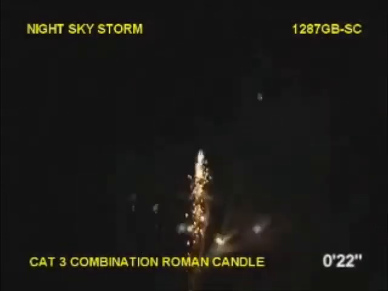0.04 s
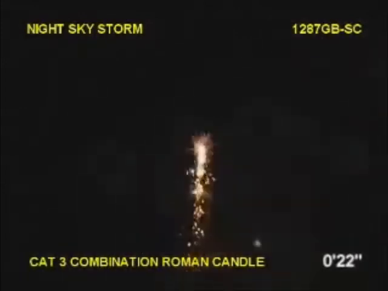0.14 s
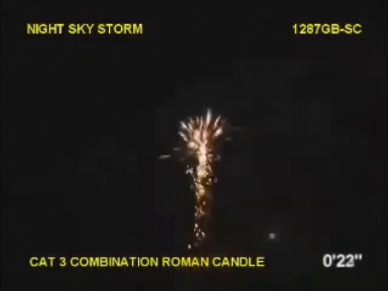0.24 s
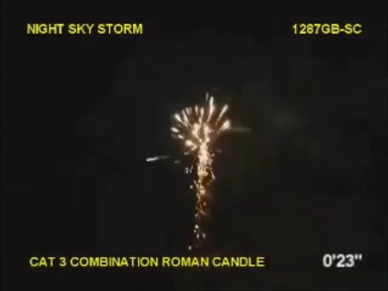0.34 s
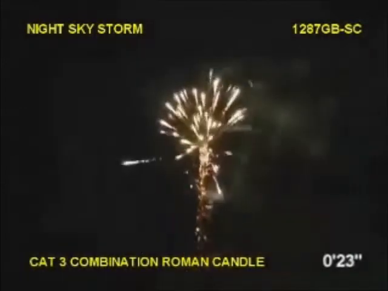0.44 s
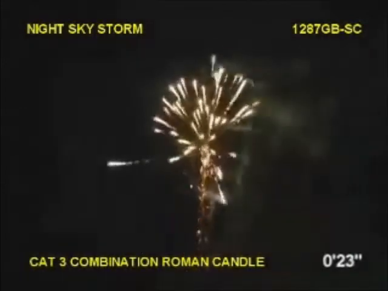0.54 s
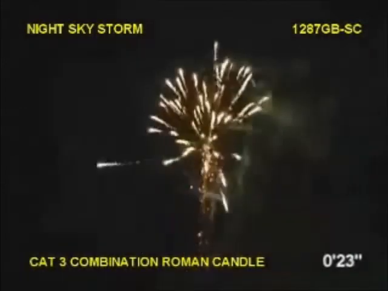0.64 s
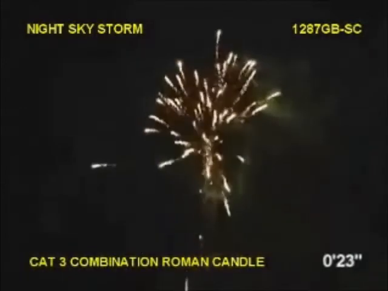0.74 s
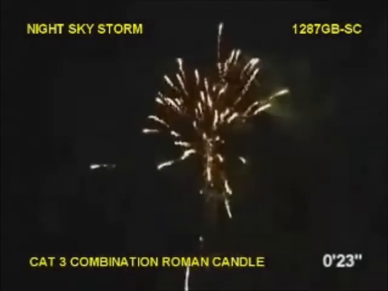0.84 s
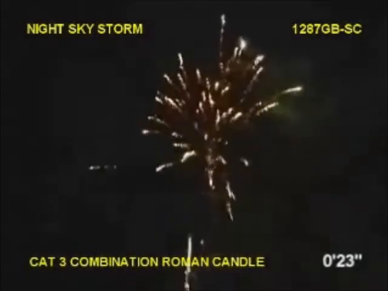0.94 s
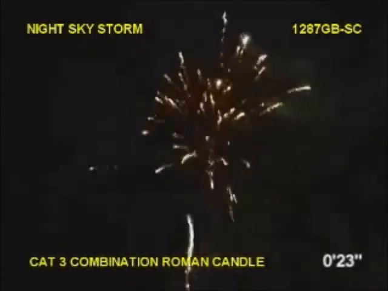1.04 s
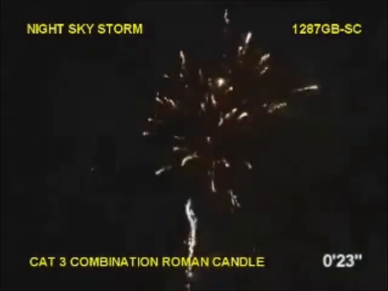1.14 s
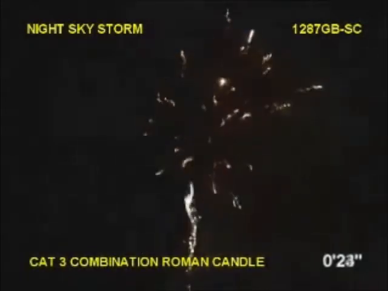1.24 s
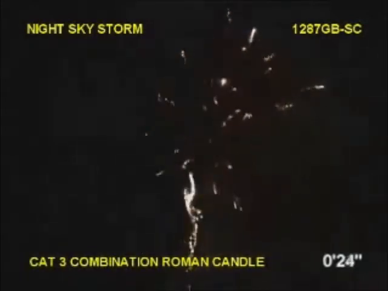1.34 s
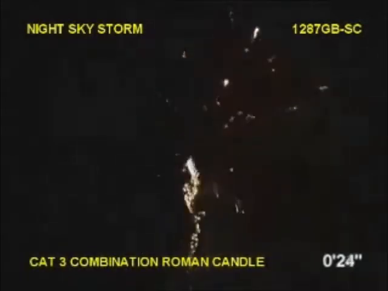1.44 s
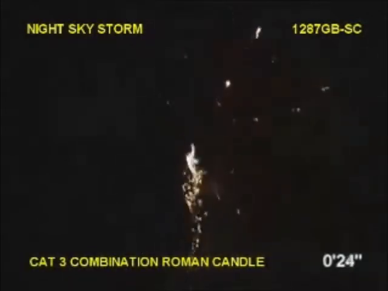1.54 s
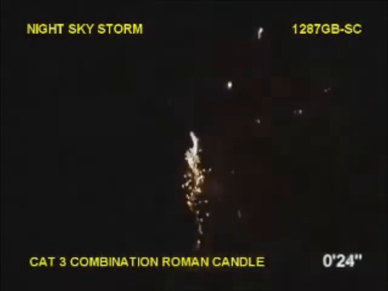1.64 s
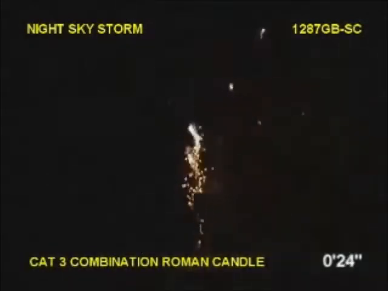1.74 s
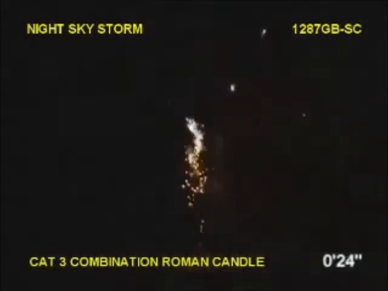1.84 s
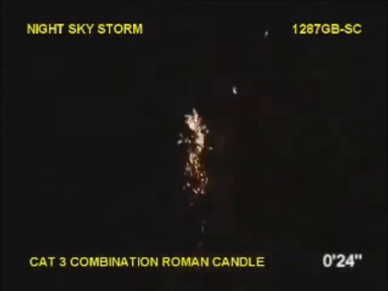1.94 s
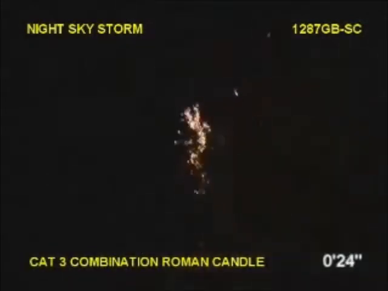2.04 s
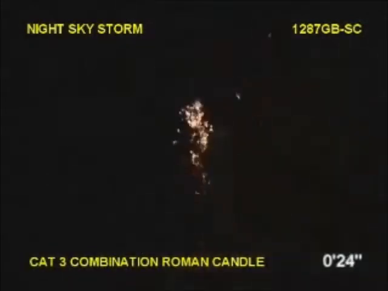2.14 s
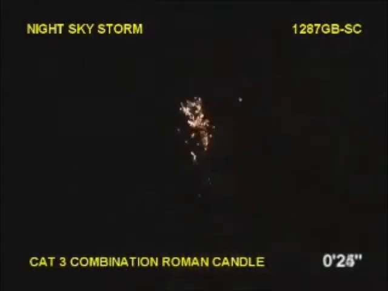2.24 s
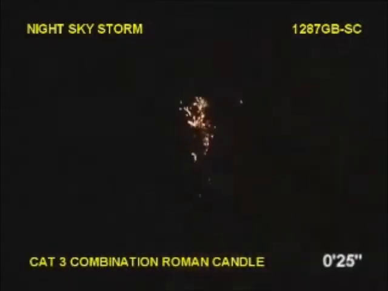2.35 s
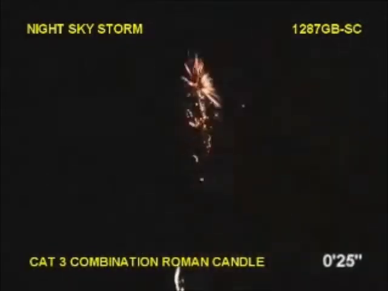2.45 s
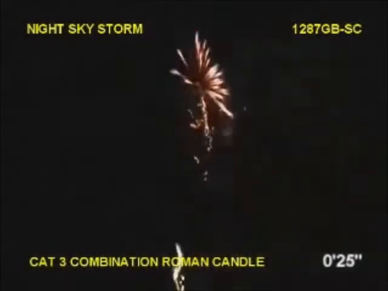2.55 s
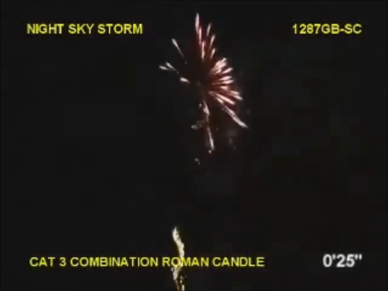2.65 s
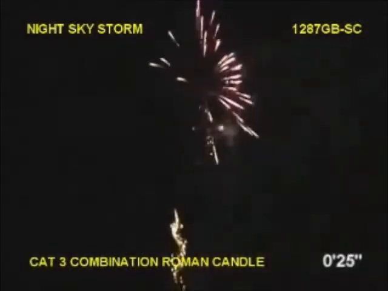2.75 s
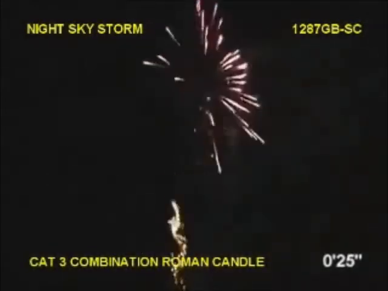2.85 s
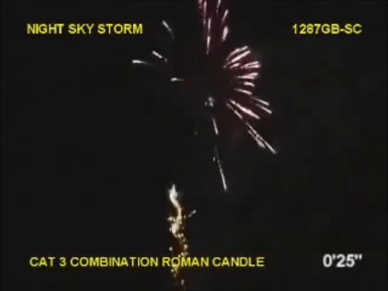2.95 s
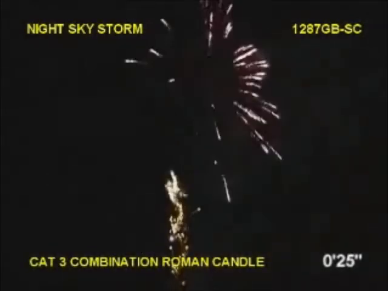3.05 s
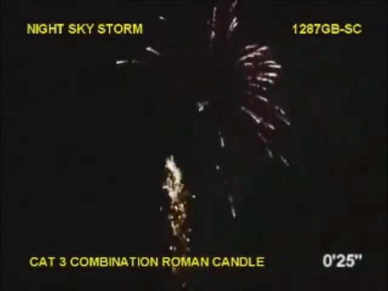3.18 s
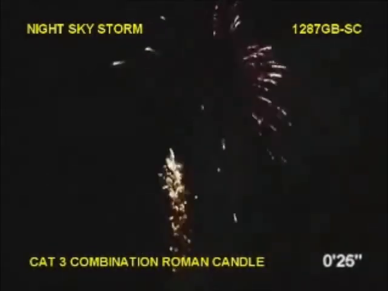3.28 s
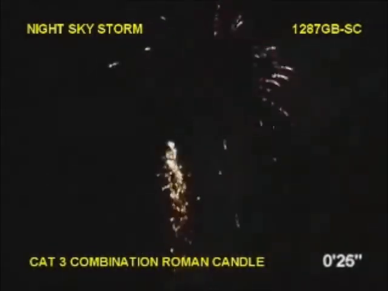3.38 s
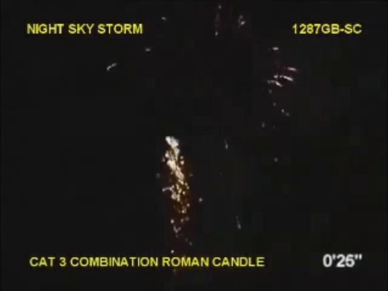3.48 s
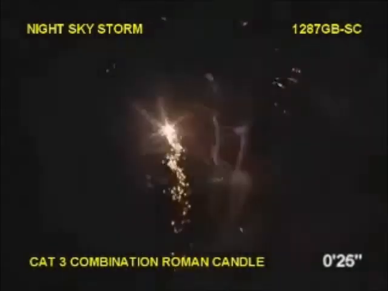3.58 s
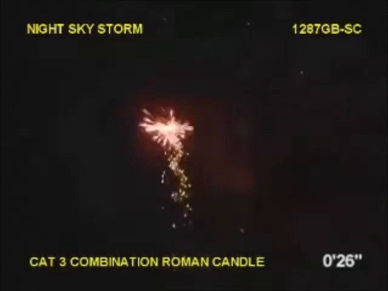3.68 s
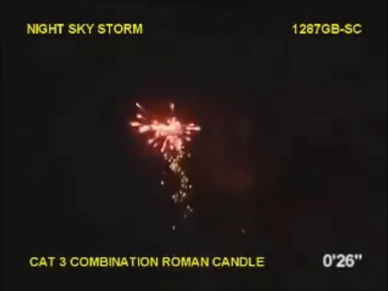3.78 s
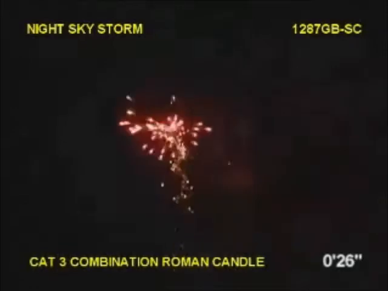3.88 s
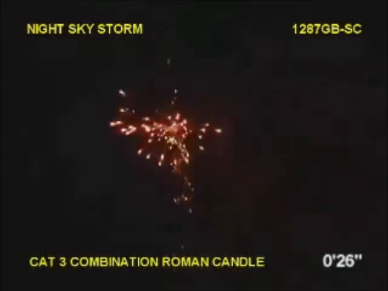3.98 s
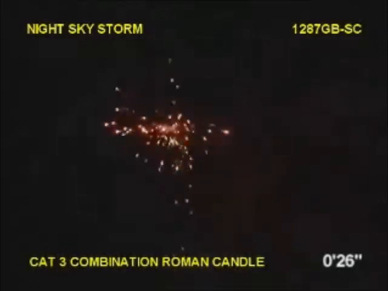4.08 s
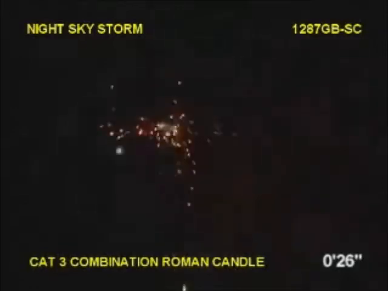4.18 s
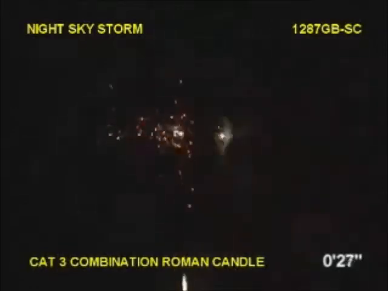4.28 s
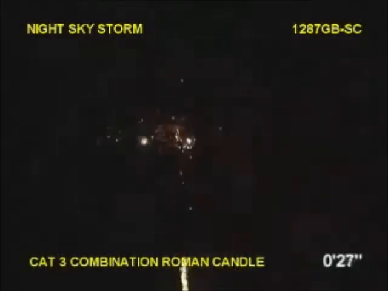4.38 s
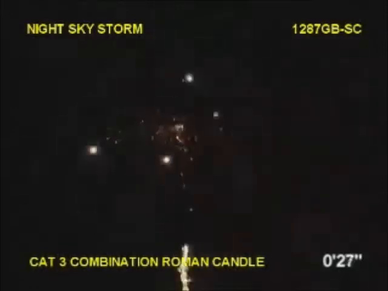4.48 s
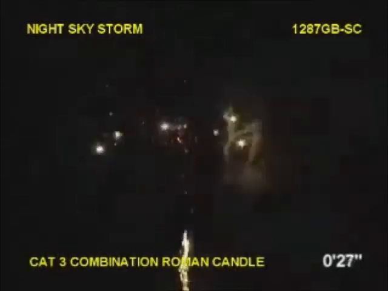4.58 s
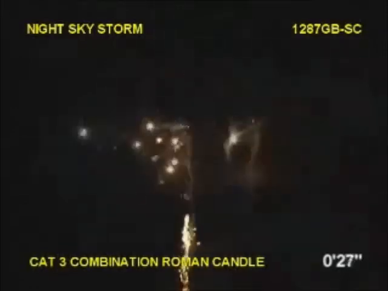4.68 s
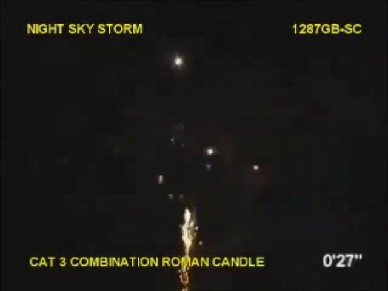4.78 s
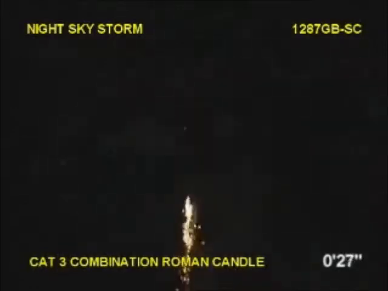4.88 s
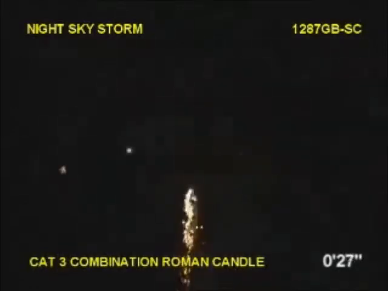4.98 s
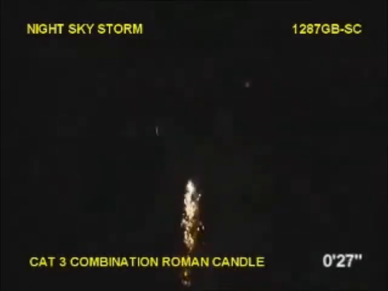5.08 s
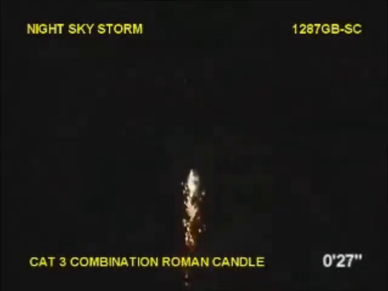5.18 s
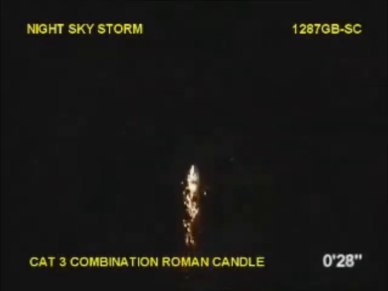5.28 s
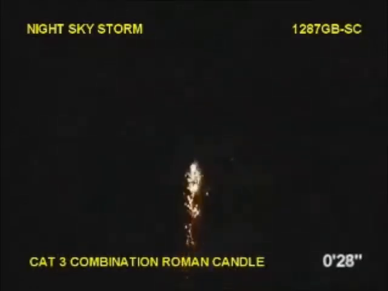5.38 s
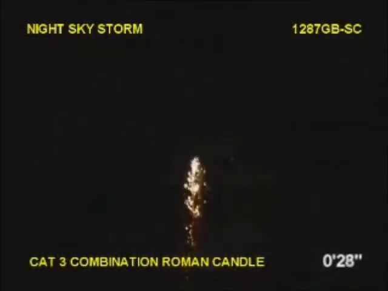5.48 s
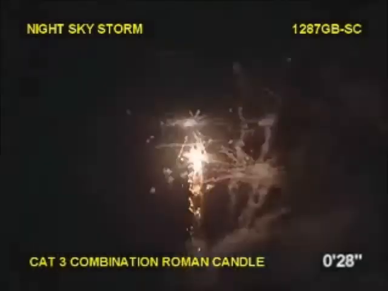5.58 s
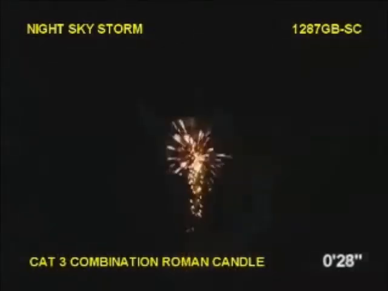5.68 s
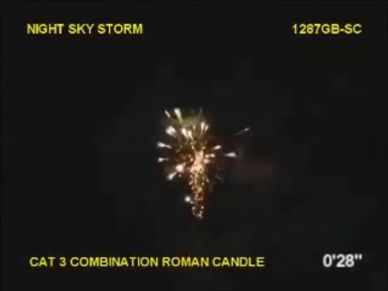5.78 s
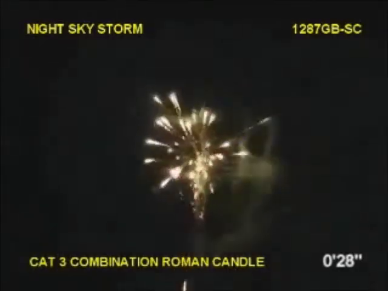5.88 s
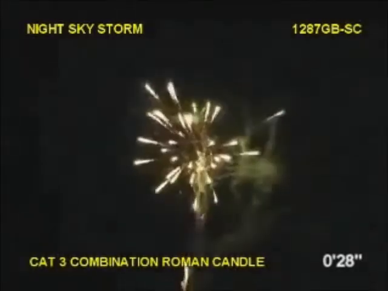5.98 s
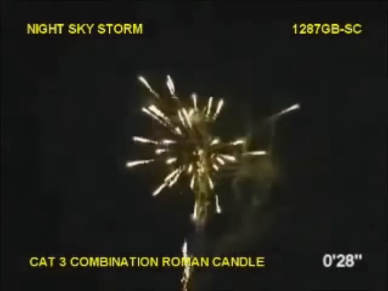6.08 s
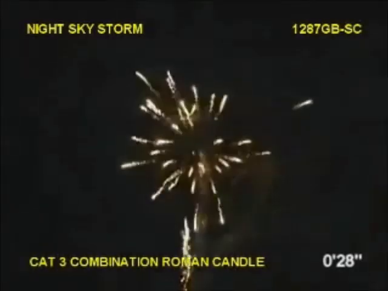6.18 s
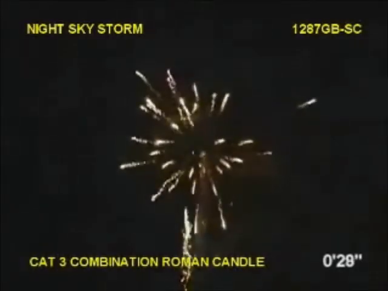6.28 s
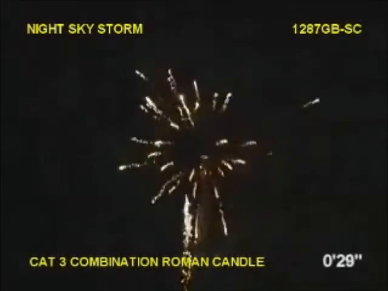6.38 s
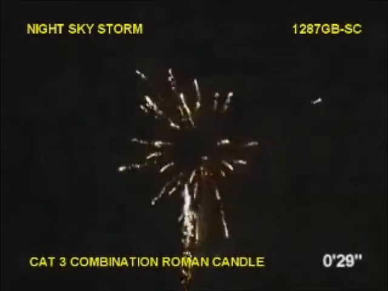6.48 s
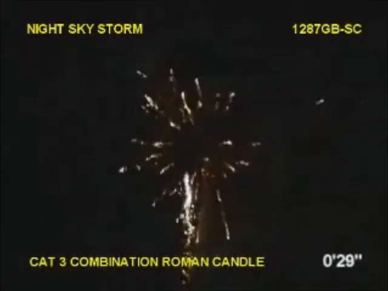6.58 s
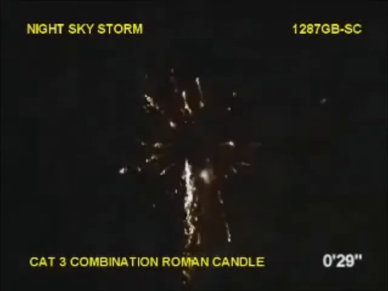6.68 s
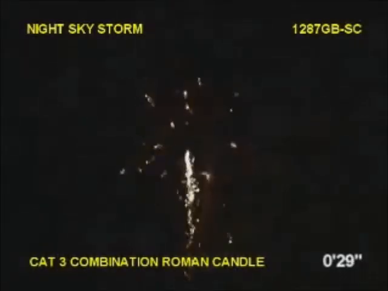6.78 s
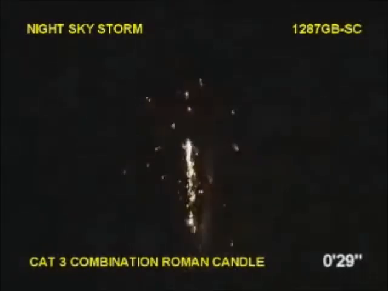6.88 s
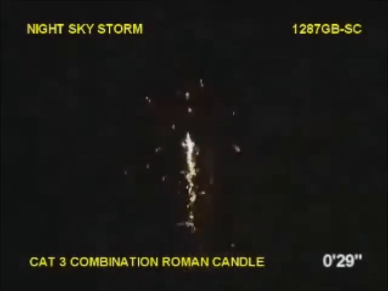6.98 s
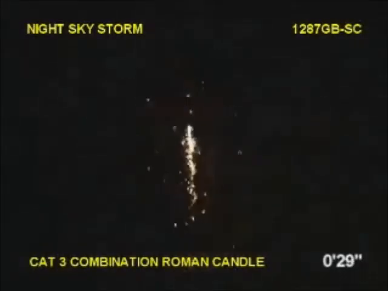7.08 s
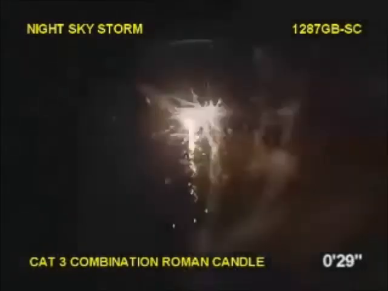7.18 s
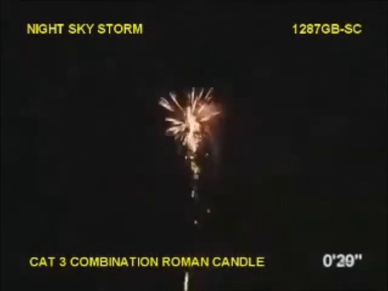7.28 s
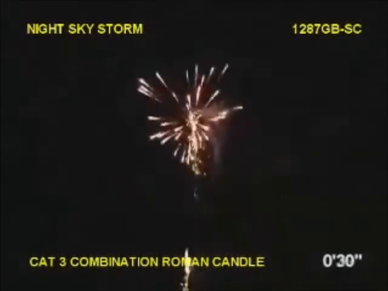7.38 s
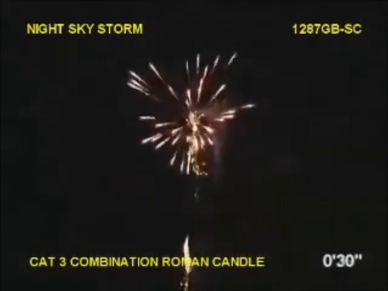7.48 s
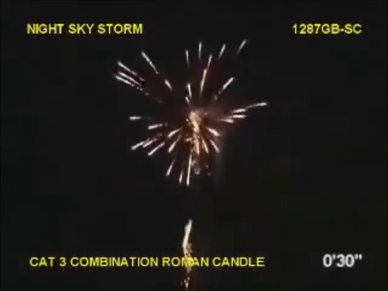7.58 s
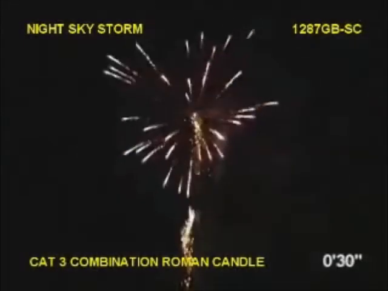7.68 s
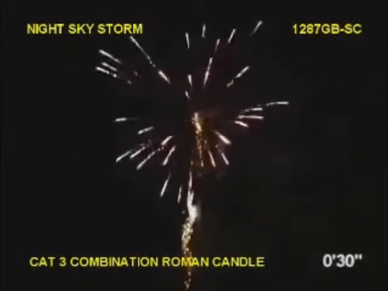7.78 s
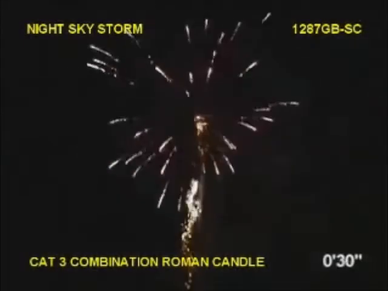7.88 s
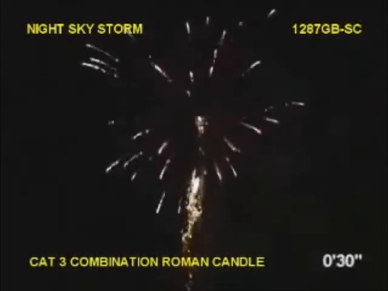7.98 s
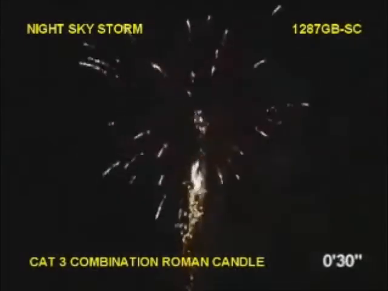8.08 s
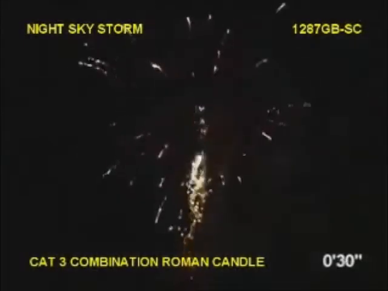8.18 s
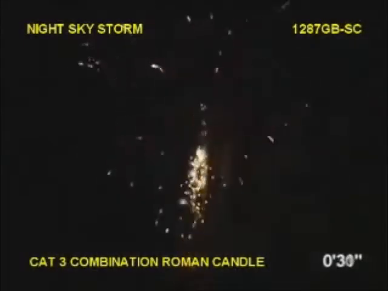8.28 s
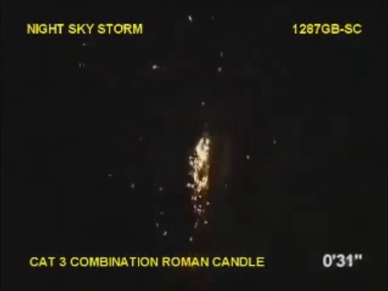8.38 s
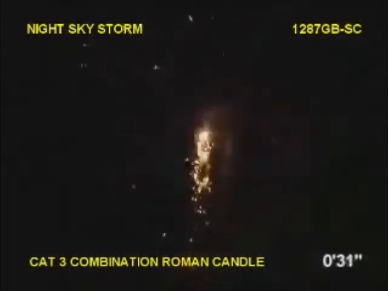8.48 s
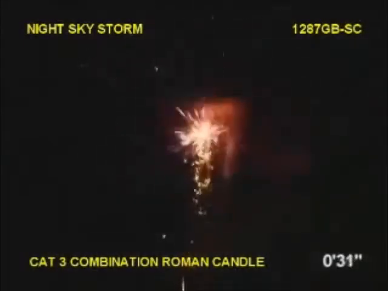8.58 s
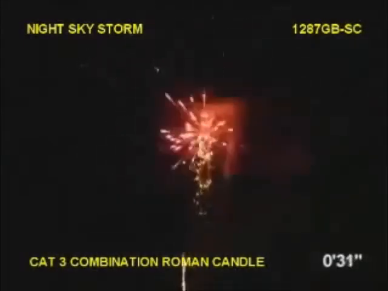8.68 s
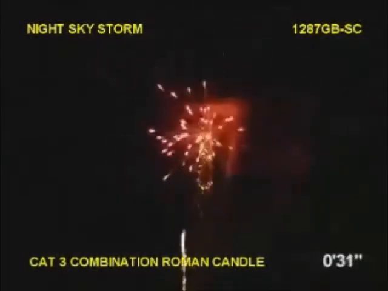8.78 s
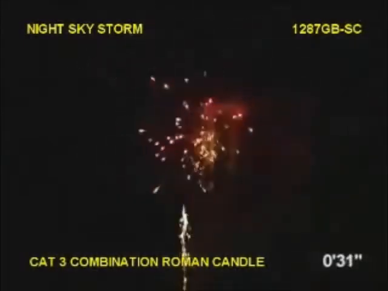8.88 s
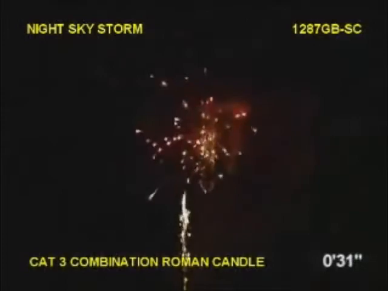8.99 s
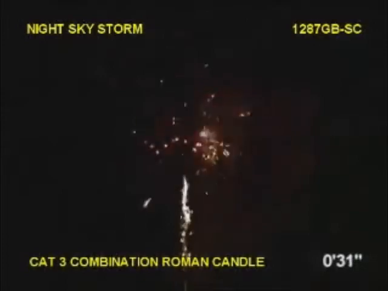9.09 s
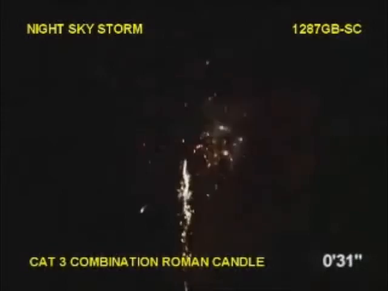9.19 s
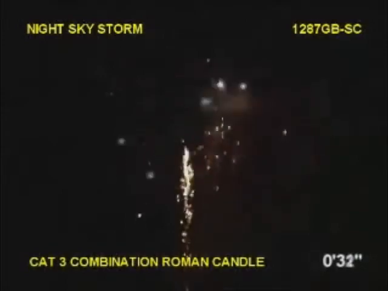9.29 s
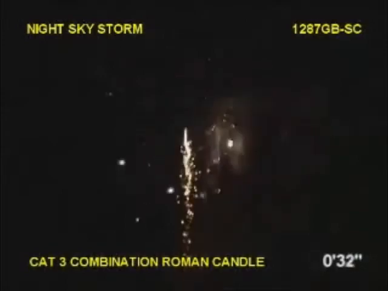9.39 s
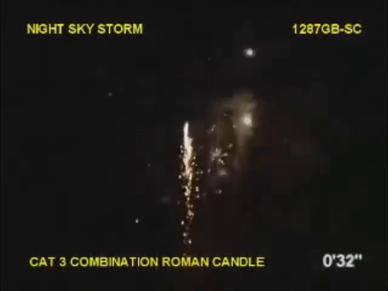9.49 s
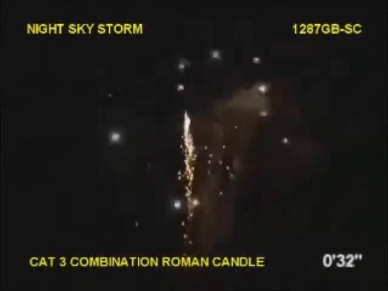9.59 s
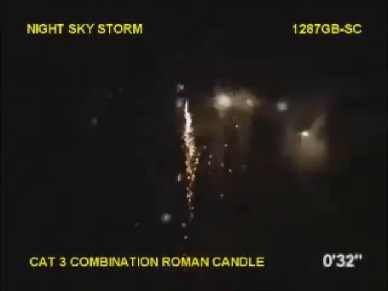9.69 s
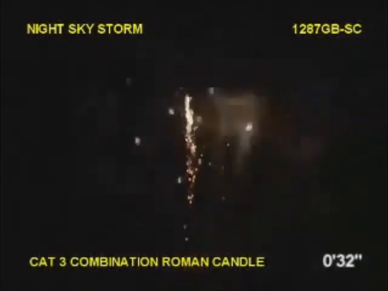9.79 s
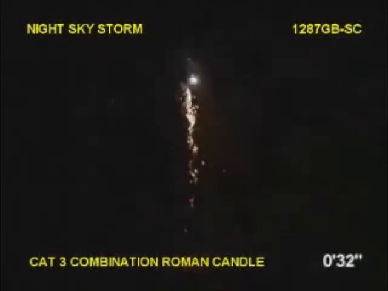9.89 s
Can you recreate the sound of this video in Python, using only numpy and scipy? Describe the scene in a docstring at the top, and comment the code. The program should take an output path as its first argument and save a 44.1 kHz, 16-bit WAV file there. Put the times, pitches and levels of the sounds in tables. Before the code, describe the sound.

Six loud firework bangs over ten seconds, each rolling off in echoes, with thudding lift shots and bouts of brittle crackle.

```python
"""Shells of a firework cake burst overhead at night, each a shock front with echoes.
Stars crackle as they fall, a shower of tiny snaps; lift charges thump low in their tubes.
Ground, walls and trees throw each bang back as echoes and scattered noise, over a wavering night.
Two microphones stand some thirty metres apart; the left hears everything first.
The loudest bangs overload the recorder."""
import sys
import numpy as np
from scipy import signal
from scipy.fft import rfft, irfft
from scipy.io import wavfile
from scipy.ndimage import uniform_filter1d

SR = 44100
rng = np.random.default_rng(int(sys.argv[2]) if len(sys.argv) > 2 else 0)


def int16_out(signal):
    """Quantize to a 16-bit WAV file."""
    q = np.round(np.clip(np.atleast_2d(signal).T, -1, 1) * 32767)
    wavfile.write(sys.argv[1], SR, q.astype(np.int16))


N = 438351  # length [samples]

# Shell bursts: (left time [s], right time [s], left level [dB], right level [dB]), before the bang's own gain
SHELL_BURSTS = [(.3669, .4566, -5, -2), (2.6235, 2.7095, -4.5, -2.5), (3.8436, 3.9328, -5.5, -2.5),
                (5.8381, 5.9286, -3.5, -2), (7.3975, 7.4866, -2, 0), (8.6935, 8.7835, -4, -1.5)]
# Single reflectors of a burst, a list for left and one for right: (delay [ms], level [dB])
BURST_REFLECTORS = ([(28, -20), (50, -22), (142, -28), (150, -28), (212, -21), (237, -20), (422, -25)],
                    [(64.5, -15), (109, -10), (113, -15), (127, -19), (144, -16), (150, -16), (158, -14),
                    (167, -15), (229, -17), (240, -15)])
GROUND_MS, WALL_MS = 2.7, 14.2  # a burst's first bounces at the right


def bursts(side):
    """Each shell is a shock front with close bounces and echoes; its click also feeds the scatter."""
    rows = np.transpose(SHELL_BURSTS)
    s, size = rows[side], amp(rows[2 + side])
    clicks = train(s, size)
    if side == 0:
        pulse = dulled(blast(.4, 270, .022, -7, .35), 4000) * amp(3)
        bounces = train(s + .00055, size * amp(-1))
        far_hz = 1400
    else:
        pulse = blast(1.4, 270, .03, -4) * amp(9)
        ground = train(s + GROUND_MS / 1000, size)
        wall = train(s + WALL_MS / 1000, size * amp(-5))
        bounces = ground + wall
        far_hz = 2000
    bang = echoed(clicks, BURST_REFLECTORS[side], pulse, far_hz)
    return clicks, bang + signal.oaconvolve(bounces, pulse)[:N]


# Crackling stars placed one by one, loud and quiet: (right time [s], right level [dB])
PLACED_STARS = [(0.091, -17), (0.1075, -7.5), (0.122, -22), (0.1413, -14), (0.1465, -5), (0.1525, -6.5),
                (0.1606, -18), (0.176, -11), (0.181, -8), (0.1883, -8), (0.2249, -6.5), (0.266, -3.5),
                (0.2955, -9), (0.3085, -11), (0.3139, -8), (0.3215, -1), (0.3268, -16), (0.3398, -10),
                (0.3537, -10.5), (0.3965, -8), (0.4432, -7.5), (0.8615, -7), (1.2293, -17), (1.2394, -26),
                (1.4056, -31), (1.4656, -37), (1.484, -23), (1.4912, -26), (1.677, -34), (1.7294, -25),
                (1.737, -21), (1.754, -28), (1.881, -21.5), (1.8914, -31), (1.9126, -24), (1.9343, -21.5),
                (2.021, -20), (2.113, -37), (2.1287, -19.5), (2.1718, -16.5), (2.2319, -20), (2.2526, -23),
                (2.4475, -16), (2.4693, -18.5), (2.473, -23), (2.5473, -23.5), (2.5661, -17.5),
                (3.0384, -17), (3.1023, -17), (3.152, -23.5), (3.3312, -18), (3.3433, -18), (3.43, -18),
                (3.4813, -20), (3.5369, -14.5), (3.6116, -26), (3.6208, -19.5), (3.6637, -18),
                (3.6824, -22), (3.7753, -17.5), (4.347, -16), (4.4405, -33), (4.559, -12), (4.573, -13),
                (4.6041, -12), (4.6434, -10), (4.6863, -10), (4.7031, -13), (4.7416, -9), (4.7938, -8.5),
                (4.8131, -14), (4.831, -13), (4.8433, -4.5), (4.8606, -15), (4.8788, -7), (4.9032, -14),
                (4.9388, -5.5), (4.9533, -8), (4.964, -15), (4.9788, -2.5), (5.0082, -7), (5.0228, -4),
                (5.0308, -4.5), (5.0506, -3.5), (5.0621, -8), (5.0683, -4.5), (5.074, -10), (5.0885, -6),
                (5.1189, -7.5), (5.1288, -10), (5.1667, -7), (5.1861, -18), (5.2068, -11), (5.256, -3.5),
                (5.2657, -6.5), (5.2774, -5), (5.2938, -26.5), (5.349, -9), (5.3814, -13.5), (5.3916, -3.5),
                (5.4108, -8.5), (5.659, -21), (5.6768, -27), (5.7525, -18), (5.7746, -29), (5.9023, -3),
                (6.3556, -29), (6.482, -25), (6.5636, -14.5), (6.6722, -16), (6.7327, -19), (6.7539, -19),
                (6.8491, -13.5), (6.8827, -24), (6.9, -16.5), (6.9827, -20.5), (7.0468, -20),
                (7.2242, -13.5), (7.236, -12), (7.33, -18), (7.4524, -12.5), (7.7485, -13), (7.901, -14),
                (7.958, -19.5), (8.0948, -18.5), (8.2685, -19.5), (8.338, -19), (8.3467, -14),
                (8.3748, -20), (8.4063, -19), (8.4311, -15.5), (8.5487, -17), (8.7759, -2.5),
                (9.1832, -16.5), (9.21, -15), (9.269, -18), (9.3218, -17.5), (9.3517, -17), (9.4307, -17.5),
                (9.5465, -7.5), (9.5902, -4), (9.6076, -8.5), (9.6145, -10.5), (9.6248, -14), (9.6896, -12),
                (9.7121, -13), (9.722, -6.5), (9.7381, -5), (9.7524, -8), (9.7775, -1.5), (9.8496, -1),
                (9.8552, -8), (9.8647, -8), (9.8757, -2.5), (9.8896, -5.5), (9.9078, -5), (9.918, -9),
                (9.93, -4)]
FILL_WITHIN_S, FILL_DB, FILL_SPREAD_DB = .016, -3, 6  # random weaker snaps strewn around each placed star
SPARKS_PER_S, SPARK_SPREAD_DB = 1200, 4.0  # fine crackle
STRAYS_PER_S, STRAY_DB, STRAY_SPREAD_DB = 14, -27, 2.5  # lone small stars
POPS_PER_S, POP_OVER_DB = 40, 19.5  # middling stars, and their height over the shower's sparks
LEFT_LEAD_S, LEFT_LEAD_SPREAD_S = .086, .007  # the left hears each star sooner
LEFT_DB, LEFT_SPREAD_DB = -12, 3.5  # and fainter


def stars():
    """Sharp snaps, large and small, each with a bounce off the ground."""
    s, db = np.transpose(PLACED_STARS)
    fill = rng.random((len(s), 2))
    fill_s = s + FILL_WITHIN_S * (2 * fill[:, 0] - 1)
    fill_db = db + FILL_DB - FILL_SPREAD_DB * fill[:, 1]

    spark_s, spark = chance(round(SPARKS_PER_S * N / SR))
    spark_db = haze_db(spark_s) + SPARK_SPREAD_DB * spark
    stray_s, stray = chance(round(STRAYS_PER_S * N / SR))
    stray_db = STRAY_DB + STRAY_SPREAD_DB * (stray - 1)
    pop_s, pop = chance(round(POPS_PER_S * N / SR))
    pop_db = shower_db(pop_s) + POP_OVER_DB + np.minimum(pop, 2)

    right_s = np.r_[s, fill_s, spark_s, stray_s, pop_s]
    right_db = np.r_[db, fill_db, spark_db, stray_db, pop_db]
    spread = rng.random((len(right_s), 4))
    left_s = right_s - LEFT_LEAD_S - LEFT_LEAD_SPREAD_S * spread[:, 2]
    left_db = right_db + LEFT_DB + LEFT_SPREAD_DB * spread[:, 3]
    left_ground_s = .0005 + .0002 * spread[:, 0]
    right_ground_s = .0021 + .0009 * spread[:, 1]

    snap = blast(0.12, 550, 0.005, -14)
    sides = []
    for at_s, level_db, ground_s, ground_db in ((left_s, left_db, left_ground_s, -4),
                                                (right_s, right_db, right_ground_s, -3)):
        size = amp(level_db)
        straight = train(at_s, size)
        bounce = train(at_s + ground_s, size * amp(ground_db))
        sides.append((straight, signal.oaconvolve(straight + bounce, snap)[:N]))
    return sides


# Showers of crackle: (start [s], full [s], fading [s], over [s], level of a spark before its spread [dB])
CRACKLE_SHOWERS = [(-.1, 0.128, 0.35, 0.82, -28.5), (4.452, 4.914, 5.2, 5.4, -31.5),
                   (9.34, 9.65, 9.95, 10.3, -32)]
SHOWER_EDGE_DB = -12.5  # level at the start and end of a shower, against its full level


def shower_db(s):
    """Each shower swells, holds and thins out."""
    edge = [-99, SHOWER_EDGE_DB, 0, 0, SHOWER_EDGE_DB, -99]
    levels = []
    for start, full, fading, over, db in CRACKLE_SHOWERS:
        times = [start - .05, start, full, fading, over, over + .05]
        levels.append(db + np.interp(s, times, edge))
    return np.max(levels, axis=0)


FLARE_DB, FLARE_FADE_DB_PER_S = -30, 33  # sparks that each burst throws out
FLARE_RISE_S = 0.18  # time to rise 20 dB
EMBER_DB = -45.5  # sparks that never stop


def haze_db(s):
    """Level of the fine sparks: the strongest of showers, the flare of each burst, and embers."""
    late = s[:, None] - np.transpose(SHELL_BURSTS)[1]
    rise = 20 * np.minimum(late, 0) / FLARE_RISE_S
    flare = FLARE_DB - FLARE_FADE_DB_PER_S * np.maximum(late, 0) + rise
    return np.max([shower_db(s), flare.max(axis=1), np.full(len(s), EMBER_DB)], axis=0)


def chance(count):
    """Random moments, and sizes that are mostly small."""
    draw = rng.random((count, 2))
    return draw[:, 0] * N / SR, np.minimum(-np.log(draw[:, 1]), 3.5)


# Lift charges: (left time [s], right time [s], left level [dB], right level [dB]), before the thump's own gain
LIFT_CHARGES = [(0.618, 0.7155, -17, -9), (2.2204, 2.317, -23, -14), (5.717, 5.8168, -23.5, -14),
                (7.0745, 7.172, -23, -13), (8.471, 8.5707, -20.5, -10)]
# Single reflectors of a lift charge, a list for left and one for right: (delay [ms], level [dB])
LIFT_REFLECTORS = ([(6, -14), (36, -9), (221, -13), (253, -17)], [(8, -12), (15, -11), (33, -6), (46, -9),
                   (109, -7), (165, -11), (241, -14)])


def lifts(side):
    """Each lift charge is a soft low thump from the tube: a dulled push with a strong low swing."""
    rows = np.transpose(LIFT_CHARGES)
    clicks = train(rows[side], amp(rows[2 + side]))
    thump = dulled(blast(.3, 255, .04, 7, .8), [1200, 5000][side]) * amp(-6)
    return clicks, echoed(clicks, LIFT_REFLECTORS[side], thump, [800, 2200][side])


def blast(push_ms, ring_hz, ring_t60, ring_db, ring_lag_ms=0):
    """A shock front: a push, a longer suck, and a low swing that dies fast (ring_t60 in seconds)."""
    t = np.arange(1500) / SR
    u = t * 1000 / push_ms
    swing = np.sin(2 * np.pi * ring_hz * (t - ring_lag_ms / 1000))
    return (1 - u) * np.exp(-u) - amp(ring_db - 60 * t / ring_t60) * swing


def echoed(clicks, echoes, pulse, far_hz):
    """The pulse straight, then duller from each reflector."""
    delay_ms, db = np.transpose(echoes)
    taps = train(delay_ms / 1000, amp(db))[:SR // 2]
    far = dulled(signal.oaconvolve(clicks, taps)[:N], far_hz)
    return signal.oaconvolve(clicks + far, pulse)[:N]


# Spectrum of the low roll: (frequency [Hz], relative level [dB])
ROLL_SPECTRUM = [(20, -32.5), (45, -5.5), (120, -10), (200, 3), (400, -3.5), (600, -5), (1200, -13.5),
                 (2000, -18.5), (3500, -69)]
# Spectrum of the high rustle: (frequency [Hz], relative level [dB])
RUSTLE_SPECTRUM = [(400, -23), (900, -13), (1600, 12.5), (3000, 11), (4300, 7), (6400, 7), (8000, 2.5),
                   (9500, -79)]


def scattered(side, low, high):
    """Countless small reflectors: low clicks set off the roll, high clicks the rustle.
    The air and the place of the bang change, so each second of clicks has its own scatter."""
    t = np.arange(2 * SR) / SR
    out = np.zeros(N + 4 * SR)
    roll_gain = scatter_gain(t, side, column=1)
    rustle_gain = scatter_gain(t, side, column=2)
    for start in range(0, N, SR):
        unevenness = evened(uniform_filter1d(rng.standard_normal(len(t)), 150))
        lumps = amp(3.63 * unevenness)
        roll = noise(ROLL_SPECTRUM, len(t)) * roll_gain * lumps
        rustle = noise(RUSTLE_SPECTRUM, len(t)) * rustle_gain * lumps
        part = signal.fftconvolve(low[start:start + SR], roll)
        part = part + signal.fftconvolve(high[start:start + SR], rustle)
        out[start:start + len(part)] += part
    return out[:N]


# Groups of small reflectors, a list for left and one for right:
# (delay [s], roll level [dB], rustle level [dB], time to die by 60 dB [s])
REFLECTOR_GROUPS = ([(.004, -19, -28, .1), (.03, -31.5, -48.5, 0.47), (.215, -29.5, -51.5, .25),
                    (.3, -37, -61.5, 1.2)], [(.005, -13.5, -13.5, 0.051), (.022, -19, -39.5, 0.19),
                    (.114, -16.5, -27, .2), (.152, -19.5, -32, 0.29), (.19, -23.5, -37.5, .3),
                    (.245, -25, -40.5, 0.24), (.385, -35.5, -48, 0.94), (.3, -31.5, -43.5, 2.92)])
SCATTER_RISE_S = .014  # time to rise 20 dB


def scatter_gain(t, side, column):
    """Gain over delay: each group of reflectors swells up to its delay, then dies away."""
    power = 0
    for row in REFLECTOR_GROUPS[side]:
        late = t - row[0]
        rise = 20 * np.minimum(late, 0) / SCATTER_RISE_S
        fall = -60 * np.maximum(late, 0) / row[3]
        power = power + amp(row[column] + fall + rise) ** 2
    return np.sqrt(power)


# Spectrum of the night background: (frequency [Hz], relative level per Hz [dB])
NIGHT_SPECTRUM = [(24, -11), (40, 29.5), (442, 7), (611, -8), (770, -24.5), (4670, 3), (6300, 11.5),
                  (8710, 7.5), (10000, -50), (13000, -94), (22000, -120)]
NIGHT_WAVER_DB, NIGHT_WAVER_S = 4, 0.02  # rms depth of the waver, and the time it is smoothed over


def night(side):
    """Coloured noise whose level is never quite steady."""
    waver = evened(uniform_filter1d(rng.standard_normal(N), round(NIGHT_WAVER_S * SR)))
    return amp([-58, -52][side] + NIGHT_WAVER_DB * waver) * noise(NIGHT_SPECTRUM, N)


def amp(db):
    """Amplitude of a level in dB."""
    return 10 ** (np.asarray(db, float) / 20)


def evened(x):
    """The signal scaled to rms 1."""
    return x / np.sqrt(np.mean(x ** 2) + 1e-20)


def noise(points, size):
    """Noise of rms 1 with the given spectrum."""
    hz = np.fft.rfftfreq(size, 1 / SR)
    f, db = np.transpose(points)
    colour = amp(np.interp(np.log(hz + 1), np.log(f), db))
    return evened(irfft(rfft(rng.standard_normal(size)) * colour, size))


def train(s, size):
    """Clicks of the given sizes at the given times in seconds."""
    at = np.round(np.asarray(s) * SR).astype(int)
    inside = (at >= 0) & (at < N)
    return np.bincount(at[inside], (size * np.ones(len(at)))[inside], N)


def dulled(x, hz):
    """A gentle low-pass takes off the treble."""
    return signal.lfilter(*signal.butter(2, min(hz, 20000), fs=SR), x)


def scene():
    """Mix the bangs, thumps, crackle, their scatter and the night for left and right."""
    out = np.zeros((2, N))
    star_sides = stars()
    for side in range(2):
        burst_at, burst = bursts(side)
        lift_at, lift = lifts(side)
        star_at, star = star_sides[side]
        thin_at = signal.lfilter(*signal.butter(2, 280, "high", fs=SR), star_at)  # small snaps hold no bass
        low = burst_at + amp([3, -6][side]) * lift_at + amp([-9, -18][side]) * thin_at
        high = burst_at + amp([-2, -9][side]) * lift_at + amp([-2, -14][side]) * star_at
        out[side] = burst + lift + star + scattered(side, low, high) + night(side)
    return out


EDGE_HZ = 10300  # upper band limit


def record(dry):
    """Overload, a faint inverted repeat, some treble shared between the two sides, a treble dip, band limits."""
    x = dry / (1 + (dry / .55) ** 4) ** .25  # soft overload towards .55
    lag = round(.00335 * SR)
    x = x - .25 * np.pad(x, ((0, 0), (lag, 0)))[:, :N]
    other_side = x[::-1]
    x = x + .2 * signal.lfilter(*signal.butter(2, [3500, 8000], "band", fs=SR), other_side)
    x = x - .35 * signal.lfilter(*signal.iirpeak(4300, 5, fs=SR), x)
    x = signal.lfilter(*signal.butter(2, 58, "high", fs=SR), x)
    slope = signal.firwin(45, 8550, window=("kaiser", 4), fs=SR)
    x = signal.oaconvolve(x, slope[None], "same")
    edge = signal.firwin(511, EDGE_HZ, window=("kaiser", 9), fs=SR)
    return signal.oaconvolve(x, edge[None], "same")


dry = scene()
out = record(dry)
int16_out(out)
```